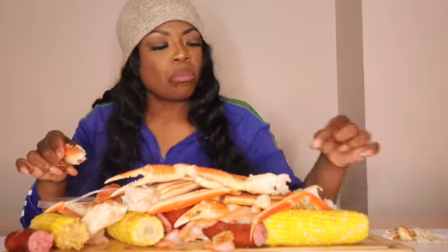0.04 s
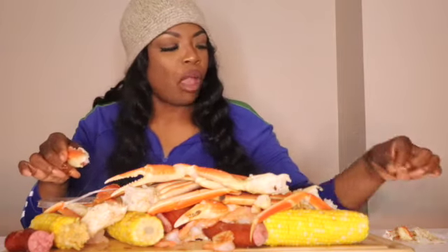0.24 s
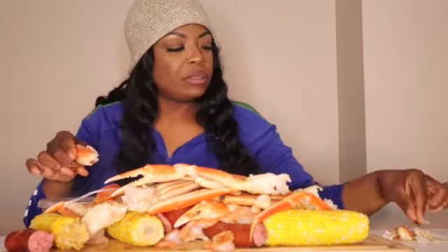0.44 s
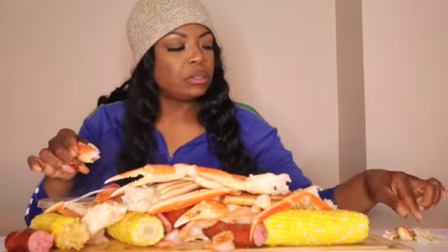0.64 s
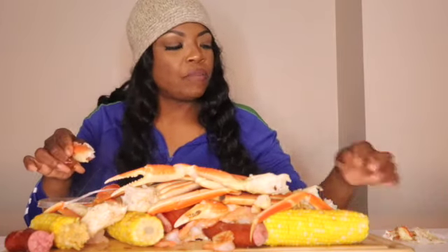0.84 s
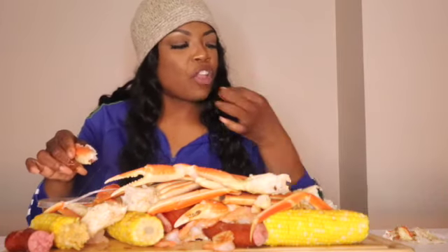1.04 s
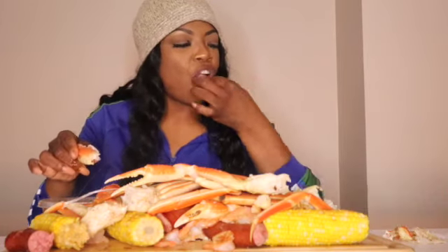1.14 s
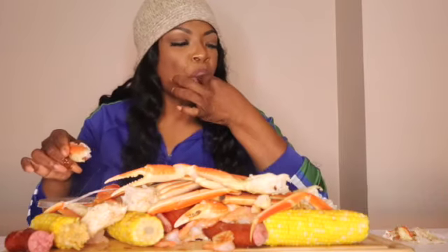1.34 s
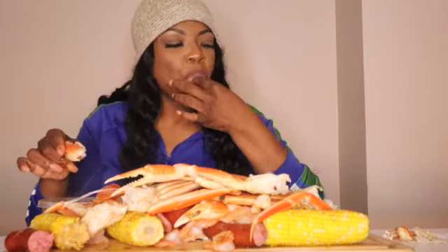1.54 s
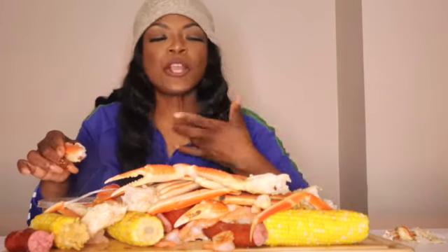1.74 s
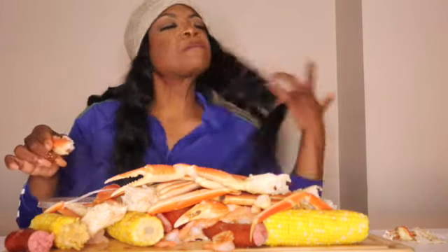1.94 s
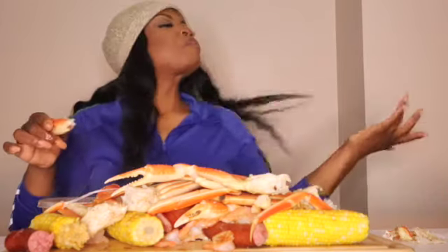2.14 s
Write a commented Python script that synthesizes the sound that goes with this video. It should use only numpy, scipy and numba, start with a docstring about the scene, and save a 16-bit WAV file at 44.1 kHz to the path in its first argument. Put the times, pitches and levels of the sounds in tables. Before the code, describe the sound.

One loud, sharp lip smack from a person eating rings through a bare, lively room, followed by tiny wet mouth clicks, sleeve rustle and a short juicy suck at the fingertips, heard in close stereo.

```python
"""Someone eating smacks their lips once, loudly: a pop strikes damped tones of the open mouth.
Small wet clicks follow (short rings), then a suck at the fingertips (noise through moving resonances).
A sleeve rustles as swells of grainy hiss. The bare, lively room answers with reflections and a tail,
over a quiet hum of shaped noise and one steady tone. A stereo microphone hears it at arm's length."""
import sys
import numpy as np
from scipy import signal
from scipy.fft import rfft, irfft
from scipy.io import wavfile
from scipy.ndimage import uniform_filter1d
from numba import njit

SR = 44100
rng = np.random.default_rng(int(sys.argv[2]) if len(sys.argv) > 2 else 0)


def undo_db(level):
    """Turn decibels back into plain size, where 20 dB means ten times bigger."""
    steps = np.asarray(level, float) / 20
    return 10 ** steps


def generate_wav(sig):
    """Save sig (samples, or channels by samples) to the path in sys.argv[1] as 16-bit PCM at SR."""
    pcm = np.round(np.clip(np.atleast_2d(sig).T, -1, 1) * 32767).astype(np.int16)
    wavfile.write(sys.argv[1], SR, pcm)


N = 97020
T = np.arange(N) / SR  # time in seconds


def unit(x):
    """Scales to an average strength (rms) of 1."""
    return x / np.sqrt(np.mean(x ** 2) + 1e-30)


def on_log(table, hz):
    """Reads a (Hz, value) table, with pitch on a logarithmic scale."""
    points_hz, values = np.array(table).T
    return np.interp(np.log(hz), np.log(points_hz), values)


def noise_pair(size):
    """Spectra of left and right noise: alike in the bass, nearly unrelated in the treble."""
    # how alike left and right are: f/Hz, likeness (0 to 1)
    likeness = [(30, 1), (80, 0.9), (160, .4), (500, 0.2), (2000, 0.041), (10000, 0.063)]
    hz = np.maximum(np.fft.rfftfreq(size, 1 / SR), 1)
    like = np.clip(on_log(likeness, hz), 0, 1)
    mid, side = rfft(rng.standard_normal((2, size)))
    opposite = np.array([[1], [-1]])
    return hz, np.sqrt(1 + like) * mid + np.sqrt(1 - like) * side * opposite


def floor():
    """Room air as shaped noise, with a faint steady tone."""
    # colour of the air noise: f/Hz, relative level/dB
    air_colour = [(13, -36), (22, -7), (64, -6.5), (250, -11.5), (356, -12.5), (408, -13), (598, -17),
                  (853, -19.5), (2540, -24.5), (9690, -43), (15000, -56)]
    hum_hz, hum_db, air_db = 412, -60.5, -49.5
    hz, noise = noise_pair(N)
    air = unit(irfft(noise * undo_db(on_log(air_colour, hz)), N)) * undo_db(air_db)
    phase = np.array([[0], [.6]])  # left, right (radians)
    return air + undo_db(hum_db) * np.sin(2 * np.pi * hum_hz * T + phase)


def ring(start, hz, t60, rise):
    """A sine struck at start that swells with time constant rise and falls 60 dB in t60 seconds."""
    first = int(start * SR)
    t = np.maximum(T - start, 0)[first:first + 2048]
    fade = np.exp(-np.log(1000) * t / t60)
    swell = 1 - np.exp(-t / rise)
    out = np.zeros(N)
    out[first:first + len(t)] = np.sin(2 * np.pi * hz * t) * fade * swell
    return out


def smack():
    """The lips part with a pop that rings the open mouth, and the cheeks puff."""
    # resonances of the open mouth: f/Hz, relative level/dB, time to fall 60 dB/s
    mouth_rings = [(1310, -5.5, .009), (1900, -.5, .0044), (2910, -2, .0115), (3650, -7, .0036),
                   (5150, -13, .005), (6400, -18, .0031), (7350, -17, .0043), (9300, -12, .0037),
                   (12300, -17, .0017)]
    start_s, rise_s, smack_db = .2358, .00008, 1.5
    puff_hz, puff_db, puff_t60_s = 470, -16.5, .006
    pop = 0
    for k, (hz, db, t60) in enumerate(mouth_rings):
        sign = (-1) ** k  # neighbours move in opposite directions
        pop = pop + sign * undo_db(db) * ring(start_s, hz, t60, rise_s)
    # the small cavity radiates little under its first resonance
    pop = signal.sosfilt(signal.butter(4, 1050, btype="high", fs=SR, output="sos"), pop)
    puff = undo_db(puff_db) * ring(start_s, puff_hz, puff_t60_s, rise_s)
    return undo_db(smack_db) * (pop + puff)


def room(x):
    """A few early reflections, then a dense tail that dies at its own pace in each pitch band."""
    # early reflections: delay/s, level/dB, left minus right/dB
    early_bounces = [(.0046, -3, -2), (.0070, -6, 2), (.0083, -6, 5), (.0128, -13, -2)]
    # how long the tail lasts: f/Hz, time to fall 60 dB/s
    tail_t60 = [(100, .45), (300, .62), (1000, .78), (3000, .74), (6000, .66), (9000, .36), (13000, .12)]
    tail_db, tail_rise_s = -.2, .008
    skew_s_per_db = .00003  # the nearer side also hears a reflection first

    # little deep bass comes back, and walls and table return a duller sound
    dull = signal.lfilter(*signal.butter(2, [290, 5200], btype="band", fs=SR), x)

    early = 0
    for delay, db, pan_db in early_bounces:
        left = np.interp(T - delay, T, dull)
        right = np.interp(T - delay - pan_db * skew_s_per_db, T, dull)
        gain = undo_db(db + pan_db * np.array([[.5], [-.5]]))
        early = early + gain * np.array([left, right])

    size = SR  # a tail of one second
    hz, noise = noise_pair(size)
    t, tail = T[:size], 0
    for centre in 62.5 * 2 ** np.arange(0, 8.1, .5):  # half-octave steps
        band = np.clip(1 - np.abs(2 * np.log2(hz / centre)), 0, 1)
        fade = np.exp(-np.log(1000) * t / on_log(tail_t60, centre))
        tail = tail + irfft(noise * band, size) * fade
    tail = tail * (1 - np.exp(-t / tail_rise_s))
    tail = undo_db(tail_db) * tail / np.sqrt(np.sum(tail ** 2) / 2)
    return early + signal.fftconvolve(tail, dull[None])[:, :N]


def peak(x, hz, width_hz):
    """A resonance with gain 1 at its centre."""
    return signal.lfilter(*signal.iirpeak(hz, hz / min(width_hz, SR / 4), fs=SR), x)


def rustle():
    """Sleeve and skin: broad, slightly grainy hiss that swells and dies with each movement."""
    # movements: start/s, rise/s, fall time constant/s, relative level/dB, centre f/Hz
    movements = [(0.904, 0.0061, 0.034, -55.5, 4000), (1.075, 0.024, 0.022, -47, 8600),
                 (1.108, .006, .07, -50, 8500), (1.126, .012, .045, -48, 2000),
                 (1.215, 0.011, 0.029, -57, 4970), (1.372, 0.064, 0.078, -43.5, 7640),
                 (1.6, .04, .1, -52, 9500), (1.749, 0.019, 0.065, -57, 7000), (1.97, .02, .15, -56, 900),
                 (1.974, .008, .04, -53, 3500), (.74, .08, .04, -62, 7100), (1.87, .11, 0.094, -54.5, 6000)]
    out = 0
    for start, rise, fall, db, hz in movements:
        attack = np.clip((T - start) / rise, 0, 1) ** 2
        swell = attack * np.exp(-np.maximum(T - start - rise, 0) / fall)
        hiss = rng.standard_normal((2, N))
        flicker = unit(uniform_filter1d(rng.standard_normal(N), size=60))
        grain = hiss * undo_db(4.3 * flicker)  # level wanders by 4.3 dB rms
        coloured = peak(peak(grain, hz, 1.2 * hz), hz, 1.5 * hz)
        out = out + undo_db(db) * swell * unit(coloured)
    return out


def clicks():
    """Films of moisture snap: each gives a tick and one short ring."""
    # snaps: start/s, relative level/dB, ring f/Hz, time to fall 60 dB/s
    snaps = [(.9115, -44, 3200, .0012), (.9175, -37, 2400, .002), (.980, -48, 5500, .003),
             (1.051, -51, 5500, .006), (1.0745, -33, 9400, .003), (1.0836, -32, 8300, .003),
             (1.1012, -33, 8000, .002), (1.1034, -28, 8050, .002), (1.1097, -36, 5100, .007),
             (1.1117, -30, 8800, .002), (1.132, -35, 1100, .003), (1.1365, -37, 2600, .002),
             (1.2262, -38, 2720, .003), (1.232, -43, 2700, .007), (1.438, -38, 5600, .005),
             (1.5465, -24, 2750, .005), (1.5525, -24, 2700, .006), (1.5595, -24, 3000, .004),
             (1.573, -28, 3600, .004), (1.5985, -25, 4000, .003), (1.6155, -29, 3800, .003),
             (1.777, -39, 5000, .002), (1.792, -39, 4500, .002), (1.845, -48, 4000, .002),
             (1.977, -42, 1200, .003), (1.980, -33, 2900, .0025), (1.9855, -35, 4500, .0015),
             (2.094, -42, 500, .005)]
    out = 0
    for start, db, hz, t60 in snaps:
        tick = undo_db(-4) * ring(start, 5000, .002, .00003)
        out = out + undo_db(db) * (2 * ring(start, hz, t60, .00015) + tick)
    return out


@njit
def sweep(x, hz, width_hz):
    """A band-pass resonance whose centre moves sample by sample."""
    y, band, low = np.empty(len(x)), 0., 0.
    for i in range(len(x)):
        g, k = np.tan(np.pi * hz[i] / SR), width_hz / hz[i]
        v = (band + g * (x[i] - low)) / (1 + g * (g + k))
        band, low, y[i] = 2 * v - band, low + 2 * g * v, k * v
    return y


def suck():
    """Air and bursting bubbles pass a cavity whose resonances come, wander and go as fingers slide."""
    # strength of the suck over time: t/s, relative level/dB
    suck_curve = [(1.49, -55), (1.508, -42), (1.543, -35), (1.548, -30), (1.56, -30), (1.566, -33),
                  (1.594, -35), (1.6, -31), (1.615, -35), (1.64, -44), (1.69, -55)]
    # cavity between lips and fingers: f/Hz, width/Hz, relative level/dB, opens/s, closes/s
    cavity_rings = [(800, 260, -2, 1.56, 1.612), (1640, 350, -4, 1.51, 1.56), (2110, 500, -5, 1.5, 1.64),
                    (2800, 550, 1, 1.5, 1.68), (3600, 750, 0, 1.52, 1.68), (5500, 1300, -2, 1.5, 1.572),
                    (9000, 4600, -3, 1.5, 1.66), (4500, 1300, -2, 1.585, 1.62), (6000, 1700, -6, 1.6, 1.65),
                    (3800, 4500, 2, 1.49, 1.68)]
    bubbles_per_s, bubble_spread_db, air_share, suck_db = 2500, 3.5, .5, -6.5
    slide_share, slide_s = .045, .02  # how far (share of pitch) and how fast the fingers detune it

    burst = rng.random(N) < bubbles_per_s / SR
    strength = undo_db(bubble_spread_db * rng.exponential(size=N))
    bubbles = burst * rng.choice([-1, 1], N) * strength
    drive = unit(bubbles) + air_share * rng.standard_normal(N)

    tone, hold = 0, int(slide_s * SR)
    for hz, width, db, opens, closes in cavity_rings:
        wander = uniform_filter1d(rng.standard_normal(N), size=hold)
        slide = unit(uniform_filter1d(wander, size=hold))
        centre = np.clip(hz * np.exp(slide_share * slide), 100, SR / 3)
        coloured = unit(sweep(sweep(drive, centre, 1. * width), centre, 2. * width))
        gate = np.clip(np.minimum(T - opens, closes - T) / .012, 0, 1)  # 12 ms fades
        tone = tone + undo_db(db) * coloured * gate
    times, levels = np.array(suck_curve).T
    return tone * undo_db(np.interp(T, times, levels, left=-120, right=-120) + suck_db)


def scene():
    """The eater sits just off centre: the sound reaches the left first, the right a little louder."""
    lead_s, left_db = .00004, -1.3  # left minus right for the level
    small_room_db = -4  # small sounds point at the microphone and stir the room less
    air, pop, cloth = floor(), smack(), rustle()
    small = clicks() + suck()
    near = pop + small
    delay = np.exp(-2j * np.pi * np.fft.rfftfreq(N, 1 / SR) * lead_s)
    late = irfft(rfft(near) * delay, N)
    echoes = room(pop + undo_db(small_room_db) * (small + cloth[0]))
    both = np.array([near, late]) + echoes + cloth + air
    return both * undo_db(np.array([[left_db / 2], [-left_db / 2]]))


def low_pass(x):
    """Removes everything above the highest recorded frequency."""
    return signal.sosfilt(signal.butter(12, 15830, fs=SR, output="sos"), x)


def record(dry):
    """The microphone rolls off the top treble and rounds peaks near full scale."""
    heard = signal.sosfilt(signal.butter(4, 13500, fs=SR, output="sos"), dry)
    knee = 7.0  # higher = harder overload
    heard = heard / (1 + np.abs(heard) ** knee) ** (1 / knee)
    return low_pass(heard)


dry = scene()
out = record(dry)
generate_wav(out)
```